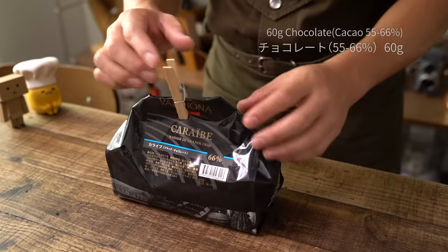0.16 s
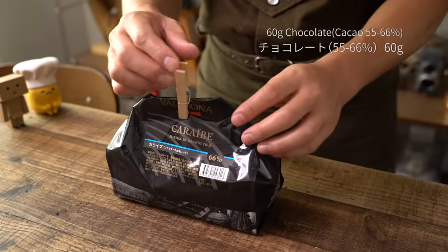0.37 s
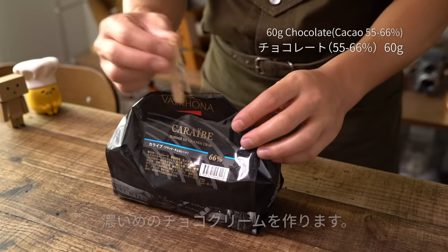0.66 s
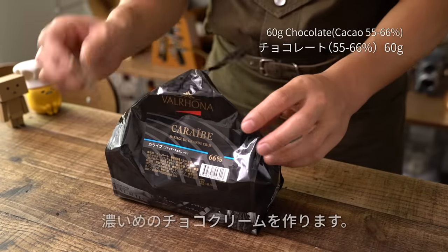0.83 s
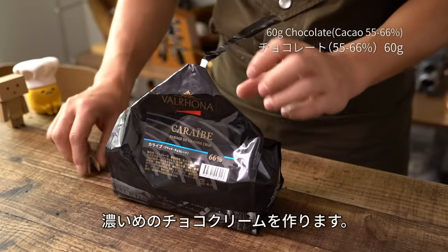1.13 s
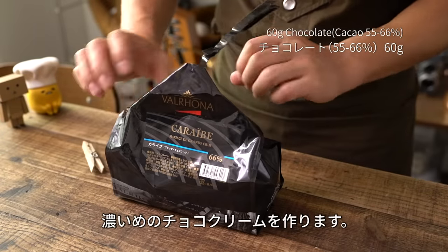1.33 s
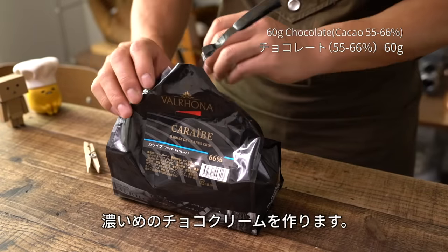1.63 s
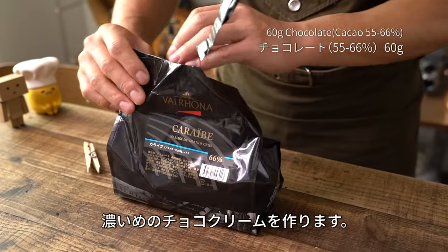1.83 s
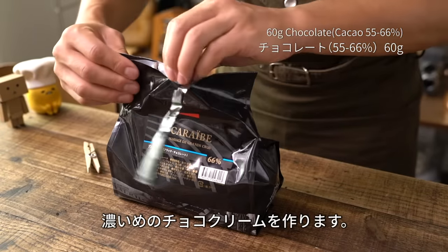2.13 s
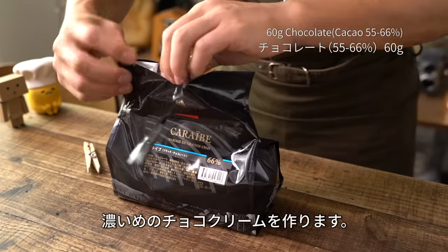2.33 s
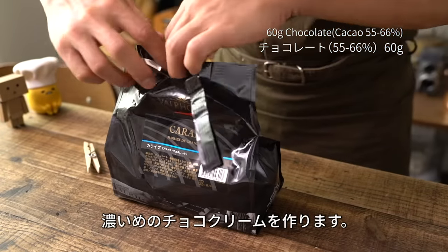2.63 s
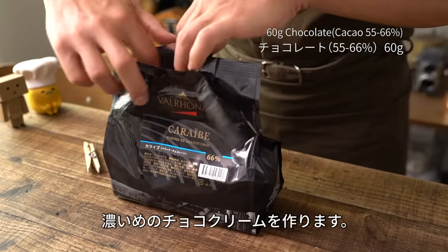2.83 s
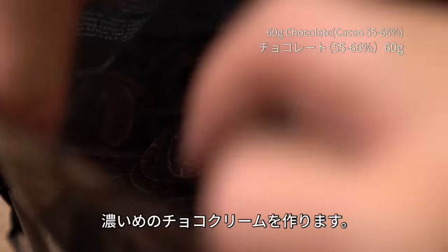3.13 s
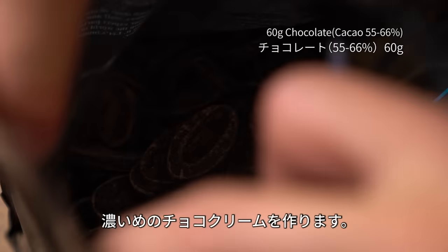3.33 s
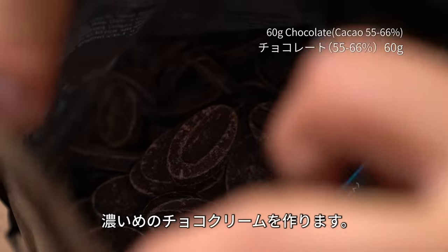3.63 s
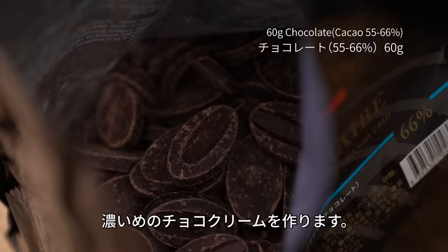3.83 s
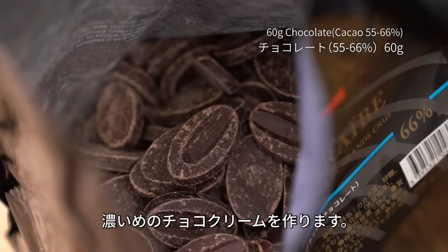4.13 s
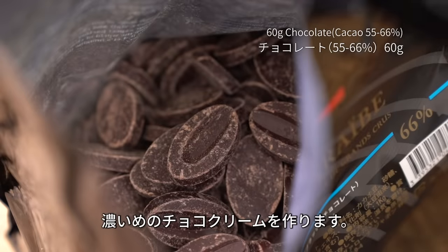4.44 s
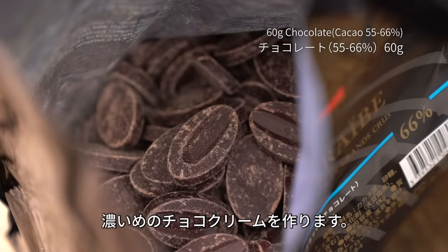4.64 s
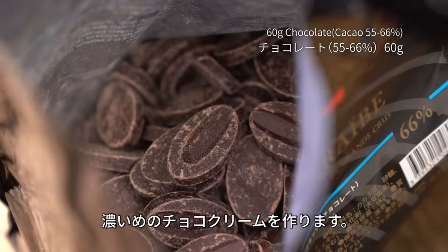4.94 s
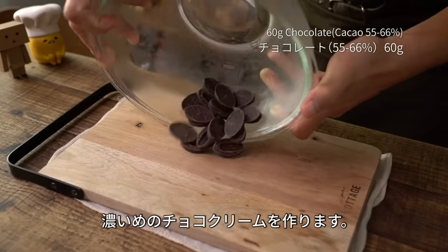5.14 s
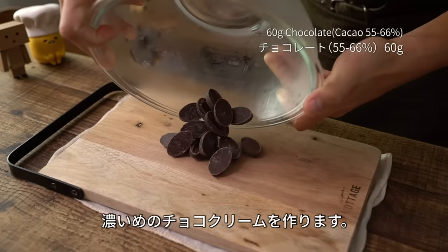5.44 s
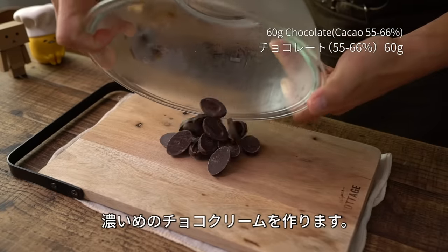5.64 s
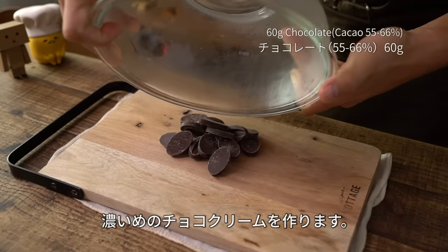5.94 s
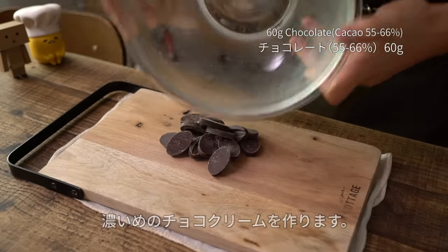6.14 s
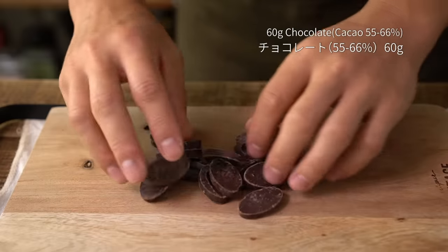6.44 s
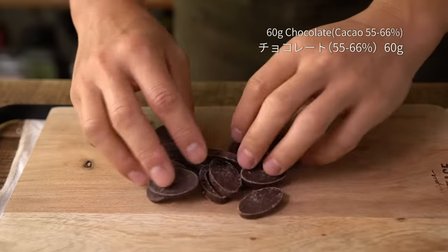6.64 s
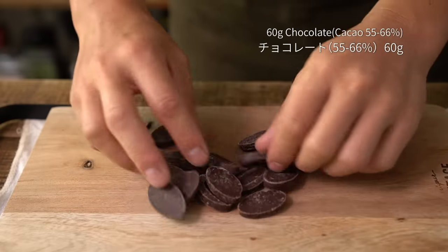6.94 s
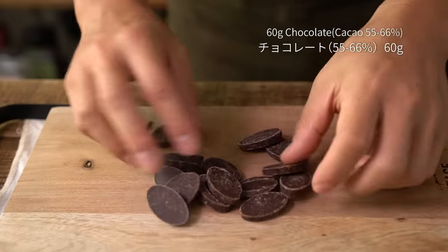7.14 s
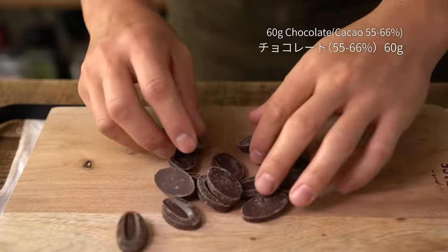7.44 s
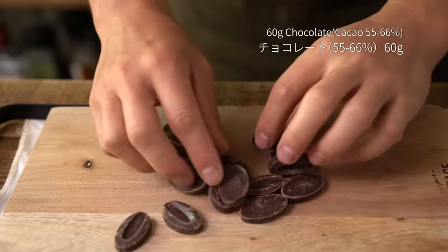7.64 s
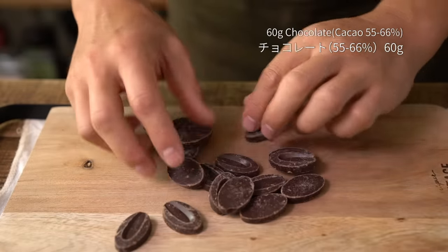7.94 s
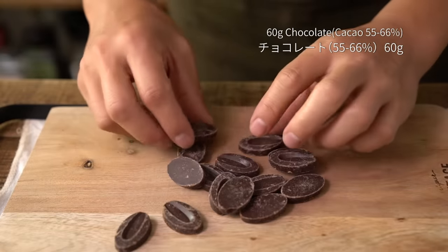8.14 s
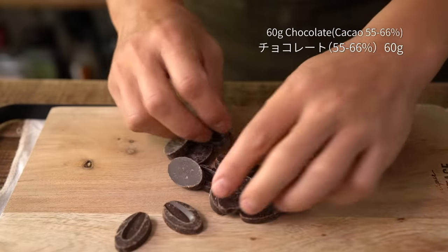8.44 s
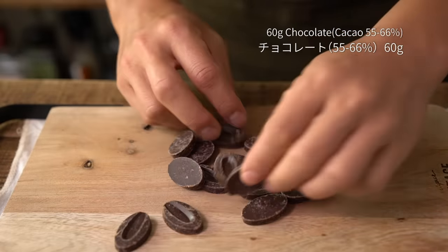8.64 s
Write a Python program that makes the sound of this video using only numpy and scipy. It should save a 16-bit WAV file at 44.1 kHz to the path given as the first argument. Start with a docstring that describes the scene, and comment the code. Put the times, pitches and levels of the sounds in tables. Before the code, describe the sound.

Close foil crackling builds and stops, a quiet pause follows, then chocolate discs tumble onto a wooden board and are spread with sharp knocks.

```python
"""A stiff foil bag, unclipped and opened on a table close to one microphone: snaps, hollow knocks, crinkle and hiss
made of filtered noise bursts. After a pause hard chocolate pieces slide out of a glass bowl (decaying sines)
onto a wooden board, and fingers spread them so that they clack (bursts through board resonances).
Low jolts of the table, a small kitchen's decaying noise tails and a steady hush; the loudest peaks clip."""
import sys
import numpy as np
from scipy import signal
from scipy.fft import rfft, irfft, next_fast_len
from scipy.io import wavfile

SR = 44100
rng = np.random.default_rng(int(sys.argv[2]) if len(sys.argv) > 2 else 0)


def pcm_store(signal):
    """Save signal as 16-bit PCM."""
    levels = np.round(np.clip(np.atleast_2d(signal), -1, 1) * 32767)
    wavfile.write(sys.argv[1], SR, levels.astype(np.int16).T)


N = 387198

# Event levels are relative to the kind's *_DB below; snap and contact tilts add to the usual *_TILT_DB_PER_OCT.
# Foil snaps: start_s, level_db, tilt_db_per_oct
FOIL_SNAPS = [(0.018, -13.5, -12), (0.27, -12.5, 3.5), (0.46, -24, -0.5), (0.567, -26, -2),
              (0.719, -8.5, -8), (0.75, -17.5, 3), (0.851, -25.5, 3.5), (0.93, -21.5, -15.5),
              (1.089, -31, -6), (1.213, -21, -14), (1.234, -24, -15.5), (1.25, -31, -24), (1.285, -16, 2),
              (1.32, -24.5, -7.5), (1.348, -25.5, -5), (1.358, -8.5, 9.5), (1.38, -2.5, -1),
              (1.553, -29, 1), (1.59, -17.5, -5), (1.644, -11, 2.5), (1.704, 1.5, -0.5),
              (1.757, -12.5, -7.5), (1.774, -0.5, 2), (1.832, -7.5, -4), (1.837, -3.5, 7),
              (1.881, -9.5, -4.5), (1.908, 4, 7.5), (1.986, -3.5, -2.5), (2.077, -9, 8),
              (2.098, -8.5, -0.5), (2.126, -14.5, -4.5), (2.151, 0.5, 1), (2.198, -7.5, -1),
              (2.334, -16, -3), (2.342, -11, -12.5), (2.395, -8.5, -2.5), (2.454, -13, -4),
              (2.502, -16, -4), (2.525, -18, 12.5), (2.537, -0.5, -3), (2.557, -6.5, 4), (2.576, -8, 2.5),
              (2.591, 1, 1.5), (2.603, 2.5, 5), (2.636, 4, 5.5), (2.663, -2.5, -1), (2.669, -5, -8),
              (2.743, -13, -20), (2.794, -8.5, -3.5), (2.818, -13, -23.5), (2.848, -3.5, -8),
              (2.876, -4.5, -3), (2.89, -5, 0), (2.903, -0.5, 5), (2.953, -8.5, -6), (2.96, -0.5, -0.5),
              (2.991, -0.5, -1), (3.093, 3.5, 0), (3.125, -9, -4.5), (3.134, 2.5, 4.5), (3.16, -13.5, 2.5),
              (3.181, 4, -2), (3.223, -6.5, 1), (3.235, -4.5, 8), (3.24, 1.5, 10.5), (3.281, 3.5, 10.5),
              (3.289, -4, 0), (3.333, 6, 8.5), (3.389, -2, 2), (3.423, -16.5, -9), (3.547, -15.5, -8.5),
              (3.721, -19, -6), (3.739, -20, 0.5), (3.796, -19.5, 0.5), (3.803, -9, -4), (3.922, -19, 13.5),
              (4.867, -23.5, -6.5)]
# Hollow knocks of the bag's walls and the peg: start_s, level_db
WALL_KNOCKS = [(0.268, -18.5), (0.362, -30), (0.474, -29), (0.57, -33.5), (0.711, -5.5), (1.09, -15),
               (1.133, -13), (1.38, -8.5), (1.88, -9), (1.988, -12.5), (2.663, -14.5), (2.745, -28),
               (2.851, -33.5), (2.962, -27), (3.094, -20.5), (3.136, -13.5), (3.179, -9), (3.312, -3.5),
               (3.442, -16), (3.545, -17), (3.752, -21), (4.863, -20)]
# Grips and pulls on the bag: peak_s, swell_s, dying_s, crinkle_db, hiss_db
BAG_GRIPS = [(0.0, .05, 0.1, -22.5, -32.5), (0.28, 0.2, 0.22, -43, -45.5), (0.47, 0.14, 0.14, -40.5, -48),
             (0.73, 0.19, 0.31, -41, -41), (0.94, 0.19, .11, -41, -49), (1.1, 0.017, 0.14, -33, -59),
             (1.24, 0.038, 0.11, -29.5, -59.5), (1.38, 0.07, 0.089, -16.5, -52),
             (1.6, 0.12, 0.9, -27.5, -41.5), (2.18, 0.48, 0.13, -28, -35.5),
             (2.35, 0.031, 0.15, -28, -27.5), (2.6, 0.15, 0.26, -21.5, -29), (2.89, 0.22, 0.16, -19, -35.5),
             (3.05, 0.43, 0.41, -52, -29.5), (3.23, 0.38, 0.39, -19.5, -29.5), (3.56, .08, 0.16, -45, -38),
             (3.68, 0.11, 0.19, -63, -34.5), (3.8, 0.15, 0.07, -24.5, -35.5)]
# Foil spectrum: freq_hz, density_db_per_hz
FOIL_SPECTRUM = [(59, -14.5), (100, 3.5), (398, 2.5), (705, -9), (1680, -6), (2520, -14), (7770, -13),
                 (16000, -24)]
# Background hush spectrum, before scaling to HUSH_DB: freq_hz, density_db_per_hz
HUSH_SPECTRUM = [(12, -41.5), (20, -14.5), (32, -20), (53, -0.5), (110, -4.5), (210, -15), (472, -24),
                 (4000, -39), (16000, -39)]
# Room decay: freq_hz, t60_s
ROOM_DECAY = [(200, 0.31), (1500, 0.13), (5000, 0.15), (12000, 0.0066)]
# Hands and bag jolting the table: start_s, level_db
TABLE_JOLTS = [(0.267, -33), (1.12, -23), (1.378, -24), (1.622, -26), (2.524, -27), (2.625, -22.5),
               (2.955, -13.5), (3.181, -15), (3.309, -14), (3.433, -31), (3.535, -23), (3.796, -18),
               (5.275, -28), (6.408, -34), (6.701, -28), (7.439, -27.5), (7.669, -32), (8.155, -28)]
# Pieces tapping the glass as they shift: start_s, level_db, tilt_db_per_oct
GLASS_TAPS = [(5.115, -41, -8), (5.143, -34, -6), (5.217, -16, 7), (5.571, -18, 12), (6.097, -41.5, 10),
              (6.235, -59, 14)]
# Pieces leaving the bowl and landing: start_s, level_db, tilt_db_per_oct
PIECE_LANDINGS = [(5.166, 1, -5), (5.233, -2.5, -4), (5.262, 0, -2.5), (5.28, -3.5, -4.5),
                  (5.305, -12.5, -8.5), (5.348, -17.5, -28), (5.369, -6, -10.5), (5.398, -2.5, -11.5),
                  (5.505, -18, -27), (5.522, -4, -4.5), (5.587, -7, -7.5), (5.642, -2, -9),
                  (5.662, -10.5, -5), (5.708, -8, -7.5), (5.717, 1.5, -9), (5.764, -3, -9), (5.776, -3, -2),
                  (5.79, -15, -5), (5.846, -14, -10), (5.866, -12.5, -11), (5.913, -20.5, -12.5),
                  (5.96, -16, -13), (5.999, -25.5, -12.5), (6.153, -29, -15)]
# Glass modes, before contact slope and random strength: freq_hz, level_db, t60_s
GLASS_MODES = [(1334, -4, 0.15), (1554, -3.5, 0.14), (2030, -18, 0.071), (2730, 0.5, 0.083),
               (2940, -2.5, 0.06), (4490, -3.5, 0.11), (6240, -11, 0.084), (7000, -15, 0.11),
               (8400, -15, 0.049)]
# Modes of board and pieces: freq_hz, width_hz, level_db
BOARD_MODES = [(276.7, 5.6, 0), (650.3, 162, 2), (885, 188, 8), (1578, 330, 5), (2430, 100, 3),
               (2606, 310, -1), (4525, 1770, 1.5), (8190, 3460, -5)]
# Pieces sliding over the board: peak_s, swell_s, dying_s, scrape_db
PIECE_SLIDES = [(5.18, 0.043, 0.41, -33.5), (5.28, 0.15, 0.258, -24), (5.78, 0.28, 0.17, -21.5),
                (6.12, 0.16, 0.374, -51), (6.3, 0.052, 0.33, -31.5), (6.5, 0.15, 0.11, -20.5),
                (6.77, 0.083, 0.11, -23.5), (6.9, 0.019, 0.19, -25), (7.16, 0.5, 0.072, -30.5),
                (7.3, 0.06, 0.074, -21.5), (7.39, 0.071, 0.18, -30), (7.6, 0.16, 0.48, -26),
                (8.13, 0.086, 0.17, -30.5), (8.37, 0.015, 0.36, -36), (8.57, 0.13, 0.26, -32.5),
                (8.78, 0.079, .1, -24.5)]
# Pieces knocking under the fingers: start_s, level_db, tilt_db_per_oct
FINGER_CLACKS = [(6.274, -23, -18), (6.287, -18.5, -0.5), (6.306, -19.5, 1), (6.338, -2, 4.5),
                 (6.398, -14, -4), (6.415, -14, -25), (6.449, -0.5, -2.5), (6.485, 6.5, 3), (6.498, 8.5, 4),
                 (6.505, 8, 5), (6.519, -9.5, -11), (6.572, -24, -9), (6.694, -10.5, -9), (6.735, -24, -5),
                 (6.757, -8.5, -0.5), (6.778, -10.5, -6.5), (6.801, -13, -1), (6.884, -0.5, -5),
                 (6.91, -6.5, -6.5), (6.977, -10, 3), (7.021, -6, 4.5), (7.034, -12.5, -9),
                 (7.094, 9.5, 2.5), (7.148, -15, -3), (7.157, -13, 8), (7.166, -9.5, -8), (7.281, 2.5, 0),
                 (7.289, 2, 11), (7.307, -14, -26), (7.366, -8, 7), (7.375, 4.5, -1.5), (7.392, 5.5, 1),
                 (7.433, -6, -4.5), (7.468, -5.5, -2.5), (7.502, 9, 1), (7.519, -10, -2.5), (7.535, -1, -2),
                 (7.588, -5, 1), (7.626, -13, 7), (7.663, -20, -31), (7.702, -12.5, -7.5),
                 (7.766, -5, -3.5), (7.807, -7.5, -5), (7.859, -18.5, -11.5), (8.033, 1.5, -1),
                 (8.143, -15.5, -8.5), (8.168, -13.5, 1), (8.266, -17, -15), (8.351, -18, -11),
                 (8.358, -1, -4.5), (8.414, -6.5, -9.5), (8.444, -17.5, -7), (8.464, -16, -13.5),
                 (8.561, -13, -7.5), (8.627, -28.5, -15), (8.704, -13, -9), (8.72, 0, -1), (8.76, 10.5, 4)]

# Energy of each kind of event at 0 dB in its table
SNAP_DB, BOOM_DB, KNOCK_DB, RING_DB, JOLT_DB = 30.5, 17, 19, -18.5, 27
SNAP_TILT_DB_PER_OCT, KNOCK_TILT_DB_PER_OCT = -2, 5
STROKE_DB = 25  # rise over the swell time, fall over the dying time
# Share of a contact's slope in the glass ring, its pivot, and the extra ring of taps
GLASS_TILT_SHARE, GLASS_PIVOT_HZ, TAP_RING_DB = 0.28, 2475, 10.5
HUSH_DB = -51.5
TOP_HZ = 16000


def amp(db):
    """dB to amplitude ratio."""
    return 10 ** (np.asarray(db) / 20)


def unit(x):
    """x scaled to rms 1."""
    return x / np.sqrt(np.mean(x ** 2) + 1e-20)


def along(points, hz):
    """Interpolate (freq_hz, value) points on a log frequency axis."""
    point_hz, value = np.transpose(points)
    return np.interp(np.log(hz + 1), np.log(point_hz + 1), value)


def filtered(x, response):
    """Multiply the spectrum of x by a complex response of frequency."""
    size = next_fast_len(N + SR // 2)
    hz = np.fft.rfftfreq(size, 1 / SR)
    return irfft(rfft(x, size) * response(hz), size)[..., :N]


def causal(points):
    """Minimum-phase response of the given (freq_hz, db) shape, by folding the cepstrum."""
    def response(hz):
        cepstrum = irfft(along(points, hz) * np.log(10) / 20)
        half = len(cepstrum) // 2
        cepstrum[1:half] *= 2
        cepstrum[half + 1:] = 0
        return np.exp(rfft(cepstrum))
    return response


def above(edge_hz):
    """Two cascaded one-pole high-passes."""
    return lambda hz: (1j * hz / (edge_hz + 1j * hz)) ** 2


def below(edge_hz):
    """Two cascaded one-pole low-passes."""
    return lambda hz: (edge_hz / (edge_hz + 1j * hz)) ** 2


def bursts(start_s, level_db, tilt_db, rise_s, t60_s, tail_db, tail_t60_s, size=4096, colour=lambda hz: 1):
    """One noise burst per event: a sharp contact, then a weaker, duller settling; soft contacts lack treble."""
    t, hz = np.arange(size) / SR, np.fft.rfftfreq(size, 1 / SR)
    noise = rng.standard_normal((len(start_s), size)) * (1 - np.exp(-t / rise_s))
    contact = rfft(noise * amp(-60 * t / t60_s))
    settling = rfft(noise * amp(tail_db - 60 * t / tail_t60_s)) * below(8000)(hz) ** 2
    # every crease or edge favours three bands of its own
    own_hz = 3200 * 2 ** (0.67 * rng.standard_normal((len(start_s), 3, 1)))
    damping = 0.3j * hz * own_hz
    own = 1 + 1.64 * (damping / (own_hz ** 2 - hz ** 2 + damping)).sum(1)
    tilt = (1 + 1j * hz / 2000) ** (tilt_db[:, None] / 6)
    shape = irfft((contact * own + settling) * colour(hz) * tilt)
    shape *= (amp(level_db) / np.linalg.norm(shape, axis=1))[:, None]
    at = np.round(start_s * SR).astype(int)[:, None] + np.arange(size)
    return np.bincount(at.ravel(), shape.ravel(), N + SR)[:N]


def crackle(rate_hz, tilt_db, t60_s, noise):
    """Random clicks of their own size and brightness on a noise bed; rms 1."""
    draw = rng.random((round(rate_hz * N / SR), 3))
    start_s = draw[:, 0] * N / SR
    size_db = -4.5 * np.log(draw[:, 1] + 0.12)
    click_tilt_db = tilt_db + 12 * (draw[:, 2] - 0.5)
    clicks = bursts(start_s, size_db, click_tilt_db, rise_s=0.00016, t60_s=t60_s,
                    tail_db=-16.5, tail_t60_s=0.0087, size=1024)
    bed = filtered(rng.standard_normal(N), lambda hz: (1 + 1j * hz / 1500) ** (tilt_db / 6))
    return unit(unit(clicks) + noise * unit(bed))


def strokes(rows):
    """One gain signal per level column: each stroke climbs to its peak and falls in dB; powers add."""
    peak_s, swell_s, dying_s, *levels_db = np.transpose(rows)[..., None]
    hop = 64  # samples per gain step
    t = np.arange(0, N + hop, hop) / SR - peak_s
    shape_db = -STROKE_DB * np.maximum(-t / swell_s, t / dying_s)
    gains = [np.linalg.norm(amp(db + shape_db), axis=0) for db in levels_db]
    return [np.repeat(gain, hop)[:N] for gain in gains]


def bag():
    """Creases buckle one by one, the walls knock; under the grips the sheet crinkles and hisses."""
    start_s, level_db, tilt_db = np.transpose(FOIL_SNAPS)
    snaps = bursts(start_s, level_db + SNAP_DB, tilt_db + SNAP_TILT_DB_PER_OCT,
                   rise_s=0.00042, t60_s=0.013, tail_db=-14.5, tail_t60_s=0.16)
    snaps = filtered(snaps, lambda hz: causal(FOIL_SPECTRUM)(hz) * above(800)(hz))
    start_s, level_db = np.transpose(WALL_KNOCKS)
    booms = bursts(start_s, level_db + BOOM_DB, 0 * start_s, rise_s=0.005, t60_s=0.023, tail_db=-27.0,
                   tail_t60_s=0.17, colour=lambda hz: (above(250)(hz) * below(600)(hz)) ** 2)
    crinkle_gain, hiss_gain = strokes(BAG_GRIPS)
    crinkle = crackle(130, tilt_db=-7.0, t60_s=0.017, noise=0.45)
    crinkle = unit(filtered(crinkle, causal(FOIL_SPECTRUM)))
    hiss = unit(filtered(crackle(59, tilt_db=-9.5, t60_s=0.012, noise=1.9), above(7500)))
    return snaps + booms + crinkle_gain * crinkle + hiss_gain * hiss


def background_hush():
    """Steady noise of the tabulated spectrum."""
    return amp(HUSH_DB) * unit(filtered(rng.standard_normal(N), causal(HUSH_SPECTRUM)))


def kitchen(x):
    """Room answer: noise tails whose frequencies die at their own speeds, a new tail every 1/8 s."""
    out, step = np.zeros(N + SR), SR // 8
    delay = 200  # samples
    for start in range(0, N, step):
        hz, t, z = signal.stft(rng.standard_normal(SR // 2), SR, nperseg=256)
        decay = amp(-60 * t / along(ROOM_DECAY, hz)[:, None])
        tail = signal.istft(z * decay, SR, nperseg=256)[1]
        wet = signal.fftconvolve(x[start:start + step], tail / np.linalg.norm(tail))
        out[start + delay:][:len(wet)] += wet
    return out[:N]


def table():
    """Each jolt shakes the table top: a low-band noise burst."""
    start_s, level_db = np.transpose(TABLE_JOLTS)
    return bursts(start_s, level_db + JOLT_DB, 0 * start_s, rise_s=0.0048, t60_s=0.039, tail_db=-27.5,
                  tail_t60_s=0.54, size=16384, colour=lambda hz: (above(45)(hz) * below(110)(hz)) ** 3)


def bowl():
    """Each piece that leaves or taps rings the glass at new strengths; sharp contacts favour the high modes."""
    out, t = np.zeros(N + SR), np.arange(SR // 4) / SR
    taps = [(start_s, db + TAP_RING_DB, tilt_db) for start_s, db, tilt_db in GLASS_TAPS]
    for start_s, level_db, tilt_db in PIECE_LANDINGS + taps:
        ring = np.zeros(len(t))
        for hz, mode_db, t60_s in GLASS_MODES:
            slope_db = GLASS_TILT_SHARE * tilt_db * np.log2(hz / GLASS_PIVOT_HZ)
            strength_db = mode_db + slope_db + rng.normal(0, 4.75)
            ring += amp(strength_db - 60 * t / t60_s) * np.sin(2 * np.pi * hz * t)
        out[round(start_s * SR):][:len(t)] += amp(level_db + RING_DB) * ring
    return out[:N]


def wood(hz):
    """Resonances of the board with the pieces on it; waxy contacts give little above 10 kHz."""
    modes = 0
    for k, (centre_hz, width_hz, level_db) in enumerate(BOARD_MODES):
        damping = 1j * hz * width_hz
        modes = modes + (-1) ** k * amp(level_db) * damping / (centre_hz ** 2 - hz ** 2 + damping)
    return modes * below(10000)(hz)


def knocks(start_s, level_db, tilt_db):
    """A hard piece hits and the board rings briefly."""
    hits = bursts(start_s, level_db + KNOCK_DB, tilt_db + KNOCK_TILT_DB_PER_OCT,
                  rise_s=0.0003, t60_s=0.011, tail_db=-4.5, tail_t60_s=0.045)
    return filtered(hits, wood)


def chocolate():
    """Knocks, glass ring, rattle of sliding pieces on the board, skin rubbing over them, table rumble below."""
    scrape_gain, = strokes(PIECE_SLIDES)
    rattle = unit(filtered(crackle(120, tilt_db=-12.5, t60_s=0.007, noise=0.46), wood))
    rub = unit(filtered(rng.standard_normal(N), lambda hz: above(5000)(hz) * below(8000)(hz) ** 2))
    rumble = unit(filtered(rng.standard_normal(N), lambda hz: (above(50)(hz) * below(100)(hz)) ** 2))
    hits = knocks(*np.transpose(PIECE_LANDINGS + GLASS_TAPS + FINGER_CLACKS))
    slides = scrape_gain * (rattle + amp(-16.5) * rub)
    return hits + bowl() + slides + amp(-28.5) * np.sqrt(scrape_gain) * rumble


def scene():
    """All sources reach one microphone; both channels are equal."""
    foil, pieces = bag(), chocolate()
    room = kitchen(amp(-17) * foil + amp(-15.0) * pieces)
    mono = foil + background_hush() + room + table() + pieces
    return np.array([mono, mono])


def record(dry):
    """Peaks flatten at full scale, then a sharp band limit."""
    return filtered(np.clip(dry, -1, 1), lambda hz: hz < TOP_HZ)


dry = scene()
out = record(dry)
pcm_store(out)
```